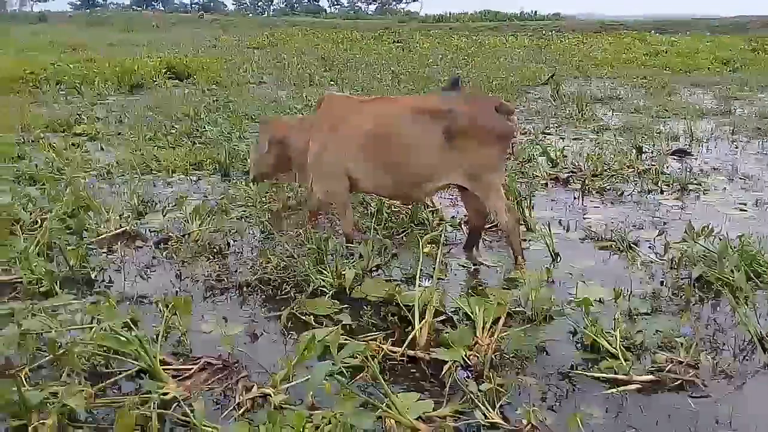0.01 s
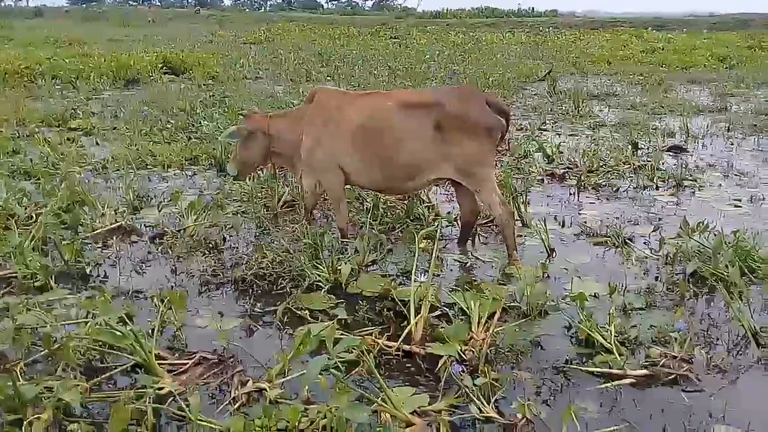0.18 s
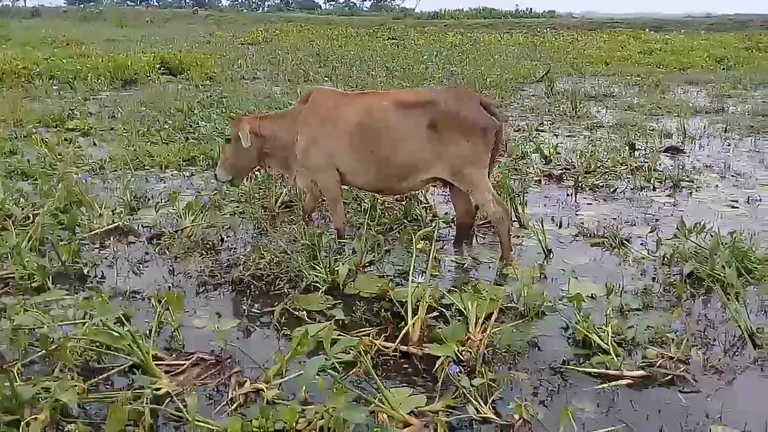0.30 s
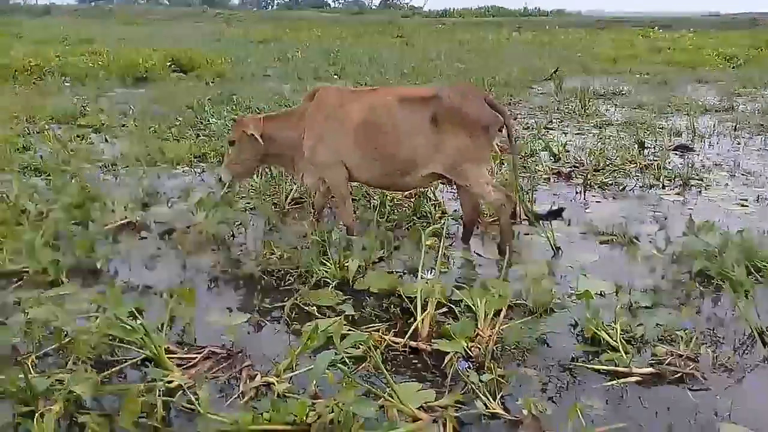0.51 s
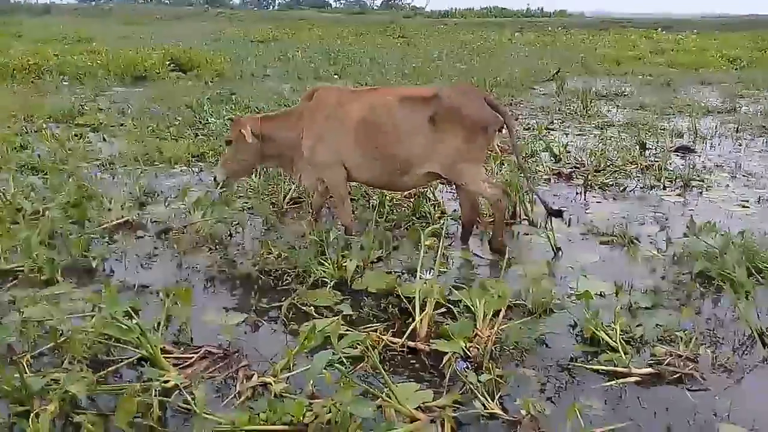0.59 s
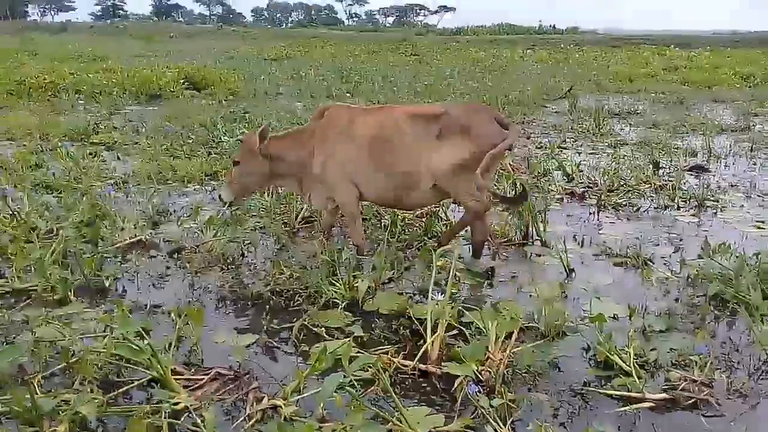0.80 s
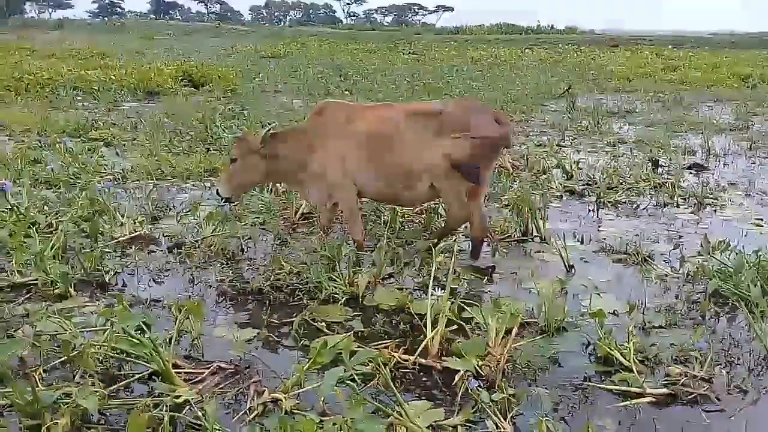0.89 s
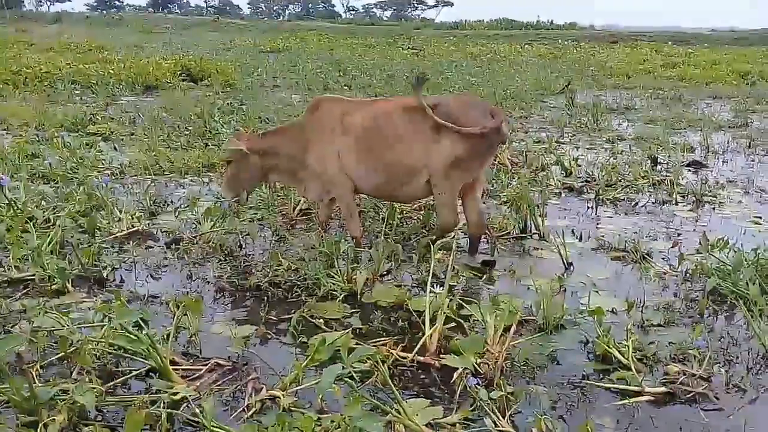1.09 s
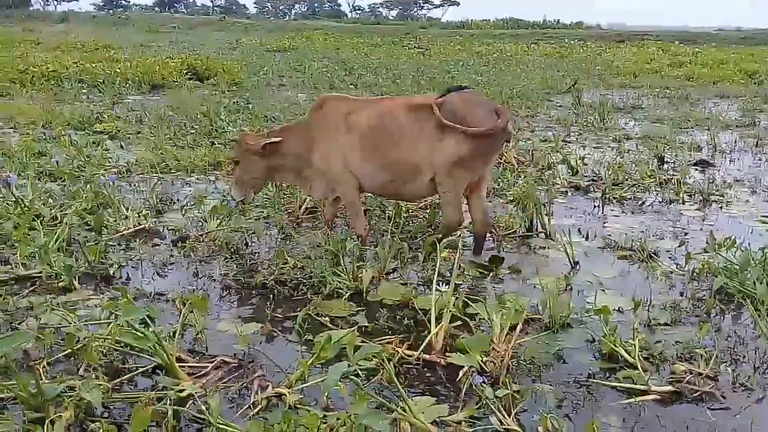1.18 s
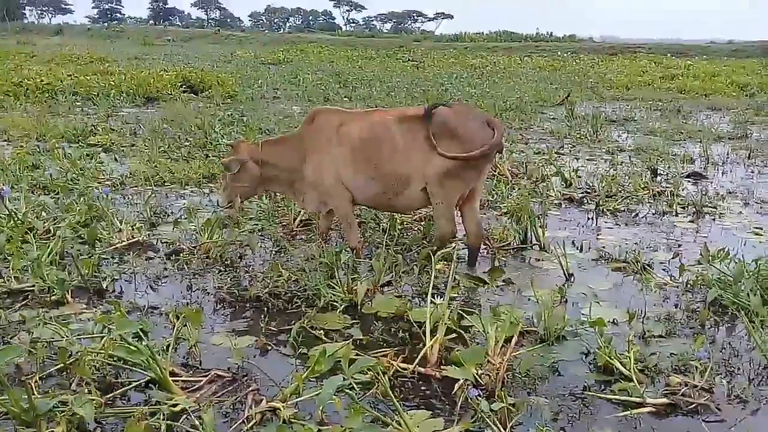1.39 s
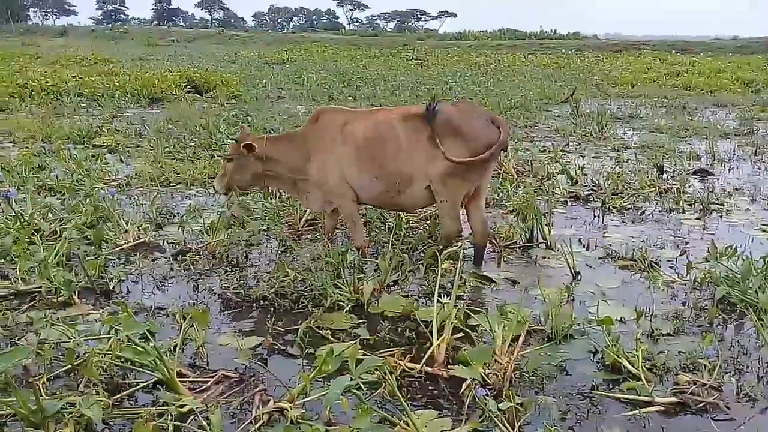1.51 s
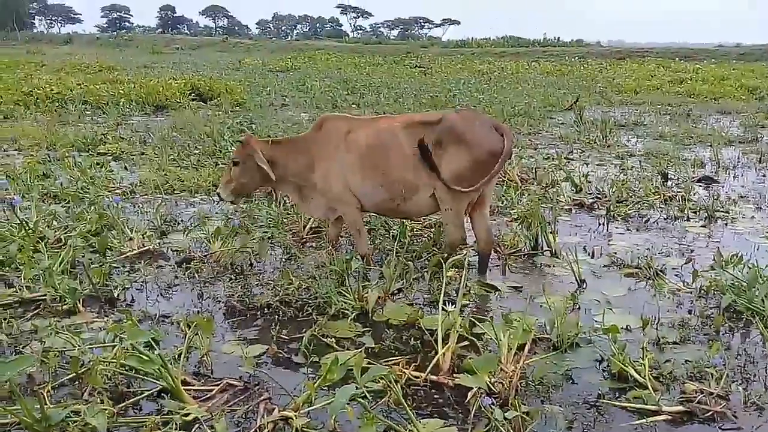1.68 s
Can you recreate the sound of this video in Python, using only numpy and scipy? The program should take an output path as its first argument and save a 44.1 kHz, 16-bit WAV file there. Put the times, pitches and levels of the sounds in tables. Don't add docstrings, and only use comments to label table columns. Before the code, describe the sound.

A cow's legs slosh and squelch through shallow marsh water, with wind thumping the microphone

```python
import sys
import numpy as np
from scipy import signal
from scipy.fft import rfft, irfft, next_fast_len
from scipy.io import wavfile
from scipy.ndimage import map_coordinates

SR = 44100
rng = np.random.default_rng(int(sys.argv[2]) if len(sys.argv) > 2 else 0)


def to_linear_factor(level_db):
    exponent = np.asarray(level_db, float) / 20
    return 10 ** exponent


def wav_record(signal):
    frames = np.transpose(np.atleast_2d(signal))
    bounded = np.clip(frames, -1, 1)
    quanta = np.round(bounded * 32767).astype(np.int16)
    wavfile.write(sys.argv[1], SR, quanta)


N = 74970

# (time [s], water stirred [dB], spray share [dB])
STIRRING = [(0, -49, -10), (.1, -60.5, -8.5), (.16, -75, 0), (.41, -80.5, -0.5), (.425, -71.5, 4),
            (.5, -77, -3.5), (.715, -73, -4), (.745, -61.5, -12), (.86, -52, -12), (.94, -71.5, 3),
            (.98, -55.5, -2), (1.15, -58.5, -4.5), (1.175, -74, 3), (1.3, -78.5, -3), (1.39, -63, -9),
            (1.42, -61.5, -4), (1.52, -62, 6), (1.55, -68.5, -11)]
# (time [s], peak [dB], first pitch [Hz], life [cycles])
SINGLE_BUBBLES = [(0.0241, -45.5, 858, 3.9), (.763, -54, 685, 3), (0.98, -60, 750, 4),
                  (1.022, -56, 766, 4.7), (1.326, -55.5, 1340, 15.4), (1.339, -62, 2320, 18),
                  (1.3654, -59.5, 1370, 7.6), (1.366, -64, 2380, 12), (1.399, -44, 1630, 8.3),
                  (1.407, -44.5, 2255, 9.5), (1.407, -48.5, 1464, 15), (1.446, -55, 1067, 23),
                  (1.5864, -56, 2400, 6), (1.6292, -66, 1800, 5.6), (1.649, -65, 2320, 3.1)]
# (time [s], peak [dB], pitch
# [Hz], life [cycles])
POPS_AND_TICKS = [(0.0132, -41.5, 1526, 3.5), (0.0662, -45, 2090, 0.77), (0.0799, -36.5, 1700, 1.06),
                  (0.4237, -48, 2270, 5.8), (0.749, -48.5, 2194, 18), (0.7657, -42.5, 2195, 20.6),
                  (0.8044, -38.5, 2150, 9), (0.8154, -39, 2330, 6.4), (0.846, -45.5, 2160, 3.5),
                  (0.9665, -47.5, 1604, 8.7), (0.9826, -41.5, 1610, 7.1), (1.026, -28, 2176, 6.1),
                  (1.0439, -37.5, 1960, 6.5), (1.0571, -45, 1930, 5), (1.0904, -45.5, 1810, 6),
                  (1.123, -51, 3240, 32), (1.138, -43, 2234, 12), (1.4475, -43, 1510, 5.4),
                  (1.47, -38.5, 1830, 3.4), (1.517, -45, 1700, 6.8), (.006, -50, 3220, 20),
                  (.026, -52, 3050, 17), (0.073, -57, 9800, 12), (.246, -60, 2370, 14), (.268, -67, 2240, 32),
                  (.292, -67, 2190, 47), (.322, -68, 2430, 24), (.43, -66, 2160, 36), (.737, -58, 2120, 16),
                  (0.794, -53, 2320, 5.9), (0.819, -36.5, 2380, 4.2), (0.813, -49.5, 1527, 8.3),
                  (.884, -56, 1887, 9.5), (.995, -52, 2170, 8), (1.013, -52, 2350, 12),
                  (1.07, -50.5, 1700, 10), (1.113, -49, 2250, 12), (1.429, -52, 9800, 20),
                  (1.434, -53, 9700, 20), (1.4382, -52, 9900, 22), (1.445, -46, 9600, 15),
                  (1.449, -39.5, 2430, 5.9), (1.484, -42, 3550, 16), (1.492, -55, 3520, 16),
                  (1.515, -49, 2570, 15), (1.363, -64.5, 5800, 30), (1.413, -59, 4000, 35),
                  (1.421, -58, 4030, 27), (0.844, -52.5, 3120, 12), (0.861, -51.5, 3200, 9.2)]
# (time [s], peak [dB], centre [Hz], sizzle [dB])
WATER_SHEETS = [(0.0134, -45, 6100, -5.5), (0.0675, -48.5, 5100, -22), (0.0768, -42.5, 3500, -5),
                (0.094, -52.5, 5860, -7), (0.116, -58.5, 6740, 1), (0.437, -58, 8400, -14),
                (0.8576, -54, 5700, -21), (0.9015, -54.5, 5200, -21), (0.9575, -49.5, 5850, -27),
                (0.9845, -44.5, 4100, -18), (1, -54, 5700, -16.5), (1.0114, -47.5, 3840, -18),
                (1.0743, -47.5, 3930, -24), (1.0895, -50, 3900, -24), (1.109, -49, 3900, -5),
                (1.3967, -60, 4080, -30), (1.4476, -53, 5000, -5), (1.4565, -50.5, 4700, 4),
                (1.468, -47, 3880, -3), (1.4779, -44.5, 3970, -27), (1.4872, -45.5, 5600, -13),
                (1.504, -54, 6160, 4.5), (1.516, -46, 4300, -5), (.42, -61, 5040, -23),
                (.446, -63, 5800, -20), (.465, -63, 5600, -17), (.766, -64, 5800, -22),
                (.864, -60, 4000, -8), (.92, -60, 4840, -14), (1.063, -60, 3800, -20),
                (1.136, -55, 5200, -2), (1.147, -55, 5440, -8), (1.229, -71, 5000, 5),
                (1.438, -50, 4140, -13), (1.4435, -49.5, 4000, -16), (1.491, -51, 5170, 3),
                (1.5095, -47.5, 5470, 0), (1.404, -58, 4700, -20), (1.41, -61, 5800, -12),
                (.058, -66, 3500, 5)]
# (frequency [Hz], density [dB per Hz])
SPLASH_SPECTRUM = [(500, -37.5), (1300, -4), (2500, 6), (4000, -2.5), (6500, -10), (9000, -22),
                   (15000, -32)]
# (frequency [Hz], density [dB per Hz])
SIZZLE_SPECTRUM = [(7000, -14), (9000, -7.5), (10800, -8.5), (12600, -17), (13800, -26)]
# (frequency [Hz], gain [dB])
PATH_COLOUR = [(800, 13.5), (1150, -0.5), (1600, 6.5), (2200, 2.5), (2950, -2.5), (3700, -4.5),
               (4600, -3.5), (5700, -2.5)]
# (centre [Hz], width [Hz], gain [dB])
ECHO_DIPS = [(1854, 94, -5), (3000, 150, 0), (3950, 100, -1), (4570, 270, -5.5), (5420, 97, -2.5),
             (6980, 680, -4)]
# (time [s], strength [dB])
WIND_STRENGTH = [(0, -49.5), (.07, -56), (.21, -40), (.26, -33.5), (.355, -35.5), (.372, -50), (.41, -41.5),
                 (.445, -34.5), (.475, -41), (.6, -49.5), (.8, -46), (.94, -62), (1.27, -58), (1.5, -58),
                 (1.56, -63), (1.7, -63)]
# (time [s], peak [dB], swing [Hz])
WIND_EDDIES = [(0.179, -45, 69), (0.215, -39, 121), (0.231, -34.5, 117), (0.245, -35.5, 67),
               (0.257, -32, 107), (0.264, -30.5, 102), (.284, -26, 165), (0.295, -57, 90), (.305, -26, 135),
               (0.337, -25.5, 133), (0.347, -28.5, 93), (0.356, -28, 93), (0.439, -37, 97),
               (0.453, -26, 112.6), (0.547, -37, 97.5), (.62, -42, 87), (.643, -40.5, 100),
               (0.698, -45.5, 72.4), (.736, -47, 94), (0.772, -40.5, 102), (0.802, -43.5, 75.5),
               (0.031, -45, 54.6), (0.423, -51, 85), (1.202, -48.5, 114), (1.498, -52, 58)]
# (frequency [Hz], density [dB per Hz])
RUMBLE_SPECTRUM = [(12, -54), (25, -5.5), (70, 2), (100, 4.5), (155, -12.5), (245, -15.5), (330, -21.5),
                   (600, -39.5), (780, -82), (1320, -120)]
# (frequency [Hz], density [dB per Hz])
MARSH_SPECTRUM = [(250, 6.5), (450, -2), (1050, -6), (1500, -12), (2200, -12.5), (3500, -21.5),
                  (5500, -20.5), (7300, -26.5), (8400, -15.5), (11000, -22), (15500, -26)]

GURGLE_HZ, GURGLE_SPREAD, GURGLE_CYCLES, GURGLE_DB, GURGLE_CLUMP_DB = 2107, 0.176, 4.05, -4.5, 2.5
SPRAY_HZ, SPRAY_SPREAD, SPRAY_CYCLES, SPRAY_DB, SPRAY_CLUMP_DB = 4800, 0.28, 4, -3, 1.8
WASH_DB, WASH_CLUMP_DB = -7, 2.2
MIST_DB, MIST_GROWTH = -63, 2.7
BUBBLE_RISE, SMALL_BUBBLE_RISE = 0.306, 0.055
BUBBLE_SWELL_S, BUBBLE_BURST = 0.00019, 0.08
POP_DB = -4
SLAP_S, SLAP_RISE, SLAP_OCTAVES, SLAP_DB, SLAP_WIDE_DB = 0.0016, 0.29, 0.17, 5.5, -12
SCATTER_DB, SCATTER_T60_S = -11, 0.09
BUFFET_DB, LUMP_DB = -5, 2
EDDY_CYCLES, EDDY_DB, EDDY_CREST = 0.36, -0.5, 0.14
INSECT_DB, STROKE_RATE_HZ, STROKE_SAG_HZ_PER_S = -73, 209, 2.5
WING_HZ, WING_FALL_HZ, WING_S, WING_SCATTER_DB, WING_BLUR_DB = 9386, 330, 0.0014, 1, -11
MARSH_DB = -67
SELF_NOISE_DB, SELF_TILT, TOP_HZ = -76.5, 0.58, 15480


def unit(x):
    return x / np.sqrt(np.mean(x ** 2) + 1e-20)


def along(points, hz):
    f, v = np.transpose(points)
    return np.interp(np.log(hz + 1), np.log(f + 1), v)


def curves(rows):
    s, *columns = np.transpose(rows)
    return [np.interp(np.arange(N) / SR, s, column) for column in columns]


def wobble(rate):
    knots = rng.standard_normal(int(N * rate / SR) + 4)
    return map_coordinates(knots, [np.arange(N) * rate / SR])


def filtered(x, response):
    m = next_fast_len(N + 8192)
    return irfft(rfft(x, m) * response(np.fft.rfftfreq(m, 1 / SR)), m)[..., :N]


def hiss(spectrum):
    return unit(filtered(rng.standard_normal(N), lambda hz: to_linear_factor(along(spectrum, hz))))


def place(s, shapes, lead=0):
    start = np.round(np.asarray(s) * SR).astype(int)[:, None]
    at = start + np.arange(shapes.shape[1]) - lead
    return np.bincount(np.clip(at, 0, N).ravel(), shapes.ravel(), N + 1)[:N]


def water():
    stir_db, spray_db = curves(STIRRING)
    stirred = to_linear_factor(stir_db) * (gurgle() + to_linear_factor(spray_db) * (spray() + wash()))
    return stirred + single_bubbles() + mist(stir_db + spray_db) + pops() + slaps()


def gurgle():
    crowd = swarm(GURGLE_HZ, GURGLE_SPREAD, GURGLE_CYCLES, count=2400)
    return to_linear_factor(GURGLE_DB + GURGLE_CLUMP_DB * wobble(59.35)) * crowd


def spray():
    crowd = swarm(SPRAY_HZ, SPRAY_SPREAD, SPRAY_CYCLES, count=6000)
    return to_linear_factor(SPRAY_DB + SPRAY_CLUMP_DB * wobble(89.04)) * crowd


def wash():
    noise = unit(filtered(hiss(SPLASH_SPECTRUM), lambda hz: to_linear_factor(path_db(hz))))
    return to_linear_factor(WASH_DB + WASH_CLUMP_DB * wobble(120)) * noise


def mist(thrown_db):
    growth_db = MIST_GROWTH * (thrown_db - np.max(thrown_db))
    return to_linear_factor(MIST_DB + growth_db + 1.2 * wobble(150)) * hiss(SIZZLE_SPECTRUM)


def single_bubbles():
    s, db, hz, cycles = np.transpose(SINGLE_BUBBLES)
    return bubbles(s, to_linear_factor(db), hz, cycles[:, None], BUBBLE_RISE)


def bubbles(s, gain, hz, cycles, rise, size=1100):
    t, hz = np.arange(size) / SR, hz[:, None]
    u = t * hz / cycles
    turns = cycles * (u + rise * (2 * u - np.log1p(2 * u)) / 2)
    decay = np.exp(-u - BUBBLE_BURST * u ** 3)
    ring = np.sin(2 * np.pi * turns) * decay * (1 - np.exp(-t / BUBBLE_SWELL_S))
    return place(s, gain[:, None] * ring / np.abs(ring).max(axis=1, keepdims=True))


def swarm(hz, spread, cycles, count):
    s = rng.random(count) * N / SR
    gain = to_linear_factor(2.2 * np.minimum(rng.exponential(size=count), 4))
    pitch = np.clip(hz * np.exp(spread * rng.standard_normal(count)), 600, 14000)
    lives = cycles * np.exp(0.45 * rng.standard_normal(count))[:, None]
    crowd = bubbles(s, gain, pitch, lives, SMALL_BUBBLE_RISE, size=300)
    return unit(filtered(crowd, lambda f: to_linear_factor(path_db(f))))


def pops():
    s, db, hz, cycles = np.transpose(POPS_AND_TICKS)[:, :, None]
    cycles = np.clip(cycles, 1, 40)
    u = np.arange(900) / SR * hz / cycles * 2
    swell = (u * np.exp(1 - u)) ** 2
    return place(s[:, 0], to_linear_factor(db + POP_DB) * swell * np.sin(np.pi * cycles * u))


def slaps():
    s, db, hz, sizzle_db = np.transpose(WATER_SHEETS)[:, :, None]
    f, u = np.fft.rfftfreq(1024, 1 / SR) + 1, np.arange(1024) / SR / SLAP_S
    body = np.exp(-(np.log2(f / hz) / SLAP_OCTAVES) ** 2 / 2)
    wide = to_linear_factor(SLAP_WIDE_DB + along(SPLASH_SPECTRUM, f) + path_db(f))
    sizzle = to_linear_factor(sizzle_db + along(SIZZLE_SPECTRUM, f))
    noise = irfft(rfft(rng.standard_normal((len(s), len(u)))) * (body + wide + sizzle))
    envelope = 1.55 * (1 - np.exp(-u / SLAP_RISE)) * np.exp(-u / 2.03)
    return place(s[:, 0], to_linear_factor(db + SLAP_DB) * envelope * noise)


def path_db(hz):
    dips = sum(db * np.exp(-((hz - centre) / width) ** 2 / 2) for centre, width, db in ECHO_DIPS)
    return along(PATH_COLOUR, hz) + dips


def scattered(x):
    t = np.arange(SR // 5) / SR
    tail = rng.standard_normal(len(t)) * to_linear_factor(-60 * t / SCATTER_T60_S) * (t > 0.002)
    return x + to_linear_factor(SCATTER_DB) * signal.fftconvolve(x, tail / np.linalg.norm(tail))[:N]


def wind():
    strength_db, = curves(WIND_STRENGTH)
    lumpy = unit(to_linear_factor(LUMP_DB * wobble(24.58)) * hiss(RUMBLE_SPECTRUM))
    return to_linear_factor(strength_db + BUFFET_DB) * lumpy + eddies()


def eddies():
    s, db, hz = np.transpose(WIND_EDDIES)[:, :, None]
    u = np.arange(-1200, 1200) / SR * hz
    phase = u + 0.045 * rng.standard_normal(hz.shape)
    swing = np.cos(2 * np.pi * phase) * np.exp(-(u / EDDY_CYCLES) ** 2 / 2)
    swing = swing + EDDY_CREST * swing ** 2
    size = len(u[0])
    swing -= swing.sum(axis=1, keepdims=True) * np.hanning(size) * 2 / size
    return place(s[:, 0], to_linear_factor(db + EDDY_DB) * swing, lead=1200)


def insect():
    k = np.arange(int(STROKE_RATE_HZ * N / SR))
    s = k / STROKE_RATE_HZ * (1 + STROKE_SAG_HZ_PER_S * k / STROKE_RATE_HZ ** 2 / 2) + 0.0024
    detune, phase, scatter = rng.standard_normal((3, len(k), 1))
    u = (np.arange(260) - 130) / SR / WING_S
    pitch = WING_HZ + 70 * detune - WING_FALL_HZ * u / 2
    turn = 2 * np.pi * WING_S * u * pitch + 3.8 * phase
    strokes = unit(place(s, to_linear_factor(WING_SCATTER_DB * scatter) * np.exp(-u ** 2 / 2) * np.sin(turn)))
    blur = hiss([(8300, -30), (9100, 1.5), (9800, -3), (10800, -39)])
    return to_linear_factor(INSECT_DB + 0.35 * wobble(2.1)) * unit(strokes + to_linear_factor(WING_BLUR_DB) * blur)


def marsh():
    return to_linear_factor(MARSH_DB + 0.75 * wobble(5.0)) * hiss(MARSH_SPECTRUM)


def self_noise():
    def response(hz):
        return (hz / 5000) ** SELF_TILT + 0.5 * np.exp(-np.log(hz / 600 + 0.00092) ** 2)
    return to_linear_factor(SELF_NOISE_DB) * unit(filtered(rng.standard_normal((2, N)), response))


def scene():
    return np.tile(scattered(water()) + wind() + insect() + marsh(), (2, 1))


def band_limit(x):
    return signal.sosfilt(signal.butter(12, 15880, fs=SR, output="sos"), x)


def record(dry):
    mix = filtered(dry + self_noise(), lambda hz: hz < TOP_HZ)
    return band_limit(mix)


dry = scene()
out = record(dry)
wav_record(out)
```